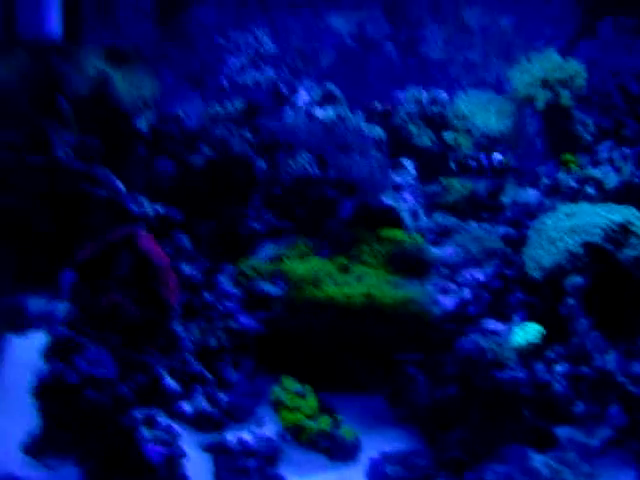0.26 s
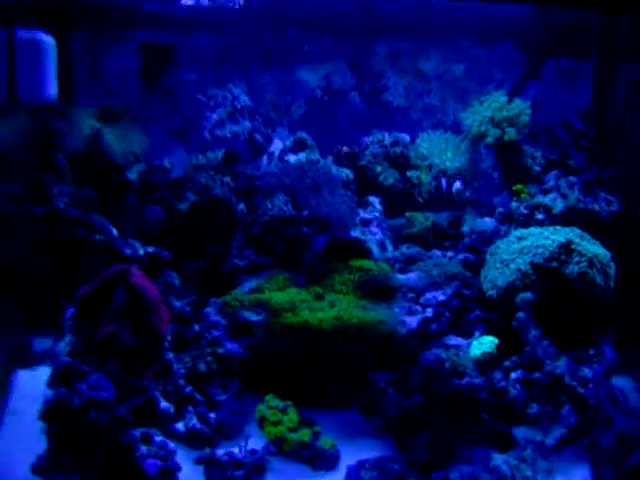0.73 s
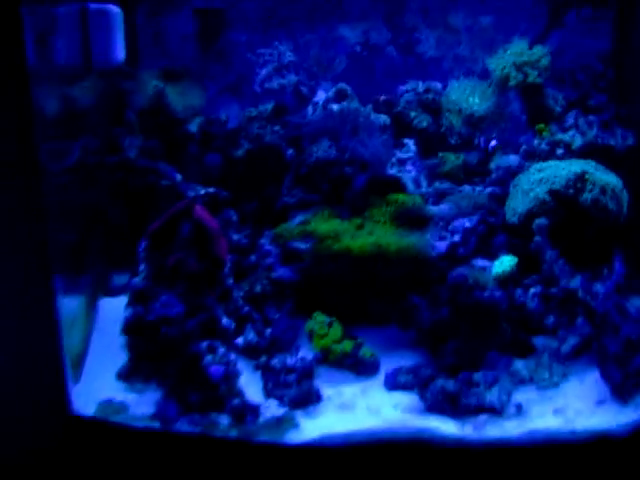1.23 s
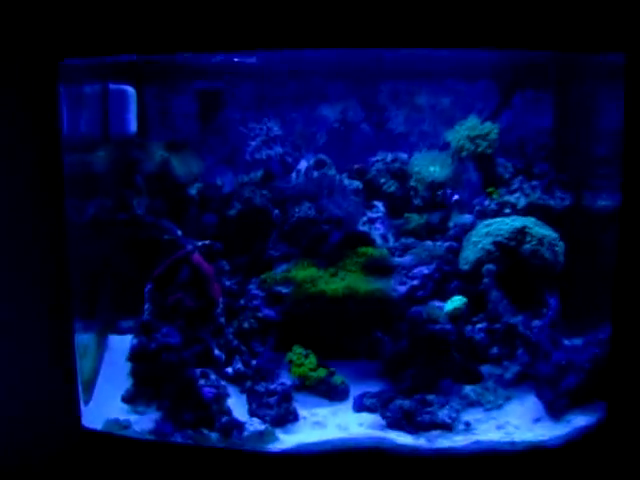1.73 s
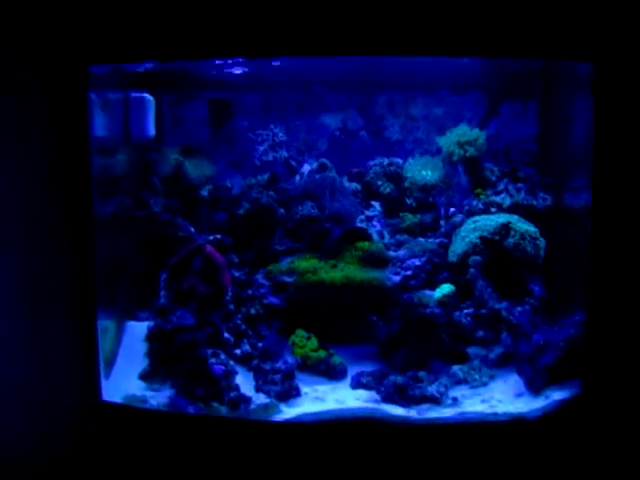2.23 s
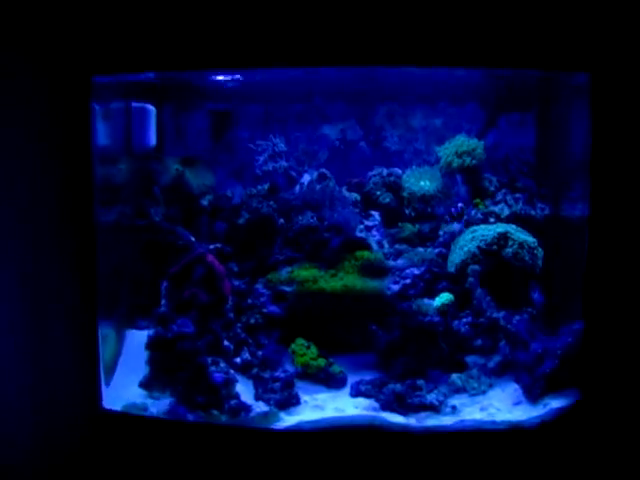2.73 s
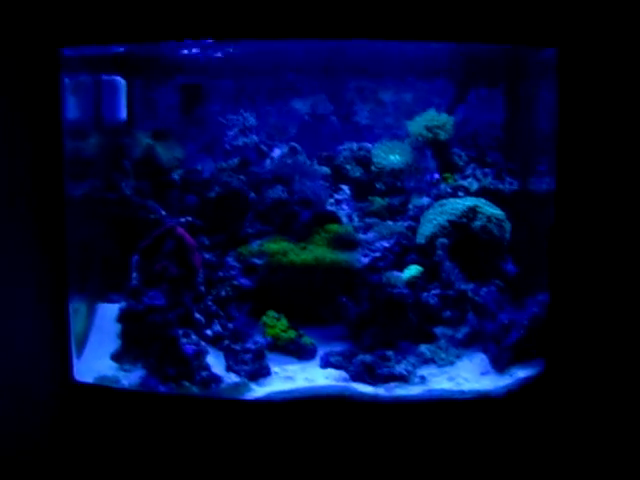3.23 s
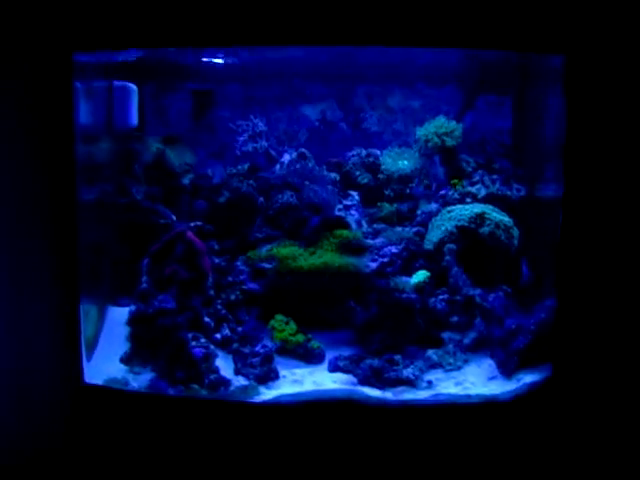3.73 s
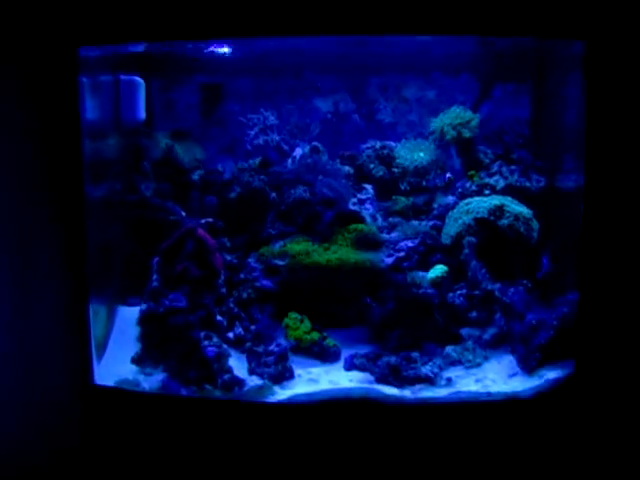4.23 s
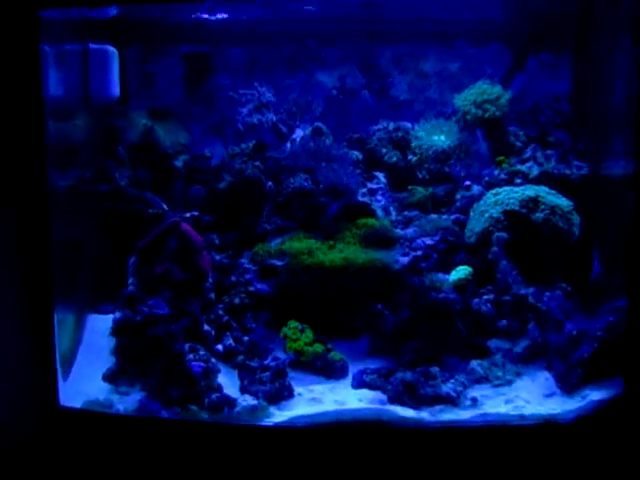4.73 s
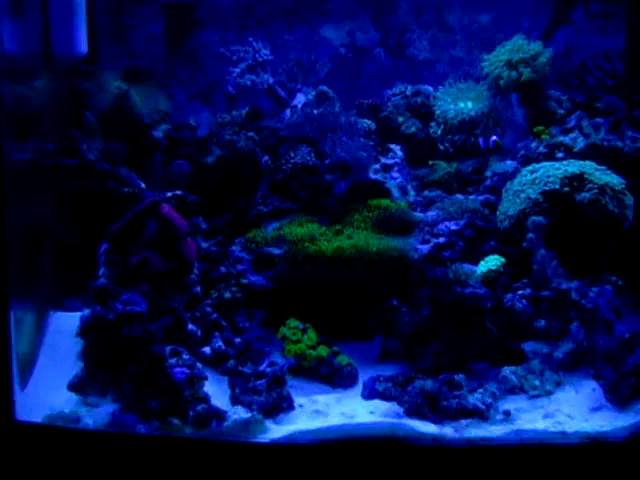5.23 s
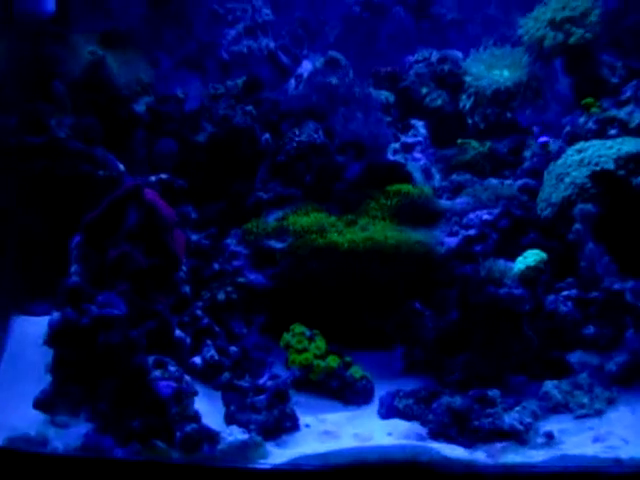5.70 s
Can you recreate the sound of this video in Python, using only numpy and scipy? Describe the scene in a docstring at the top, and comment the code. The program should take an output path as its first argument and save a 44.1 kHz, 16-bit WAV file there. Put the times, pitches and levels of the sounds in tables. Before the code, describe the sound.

A wooden floor creaks briefly, followed by soft knocks, over the steady hum, trickle and drips of a fish tank.

```python
"""Reef aquarium in a quiet room

The pump hums while returning water trickles, drips and splashes into a ringing overflow.
Someone steps back: a floorboard creaks as it sticks and slips, a few soft knocks follow,
and clothing rustles. The small microphone has a resonance high in the treble."""
import sys
import numpy as np
from scipy import signal
from scipy.fft import rfft, irfft, next_fast_len
from scipy.io import wavfile
from scipy.ndimage import map_coordinates

SR = 44100
rng = np.random.default_rng(int(sys.argv[2]) if len(sys.argv) > 2 else 0)


def wav_out(sig):
    """Save sig, one row per channel (or a flat mono array), as 16-bit PCM at SR to the path in sys.argv[1]."""
    wavfile.write(sys.argv[1], SR, np.round(np.clip(np.atleast_2d(sig).T, -1, 1) * 32767).astype(np.int16))


N = 262836

# The pump's tones. Each row: multiple of the mains frequency, relative level in dB.
PUMP_TONES = [(2, -29.5), (3, -21.5), (4, -10.5), (5, -27), (6, 0), (7, -27), (8, -23), (13, -17.5)]

def pump(mains_hz=60, level_db=-51, strong_waver_db=0.73, weak_waver_db=2):
    """The pump shakes the tank; its weak tones waver most, as they do when a microphone moves."""
    t = np.arange(N) / SR
    hum = np.zeros(N)
    for multiple, db in PUMP_TONES:
        phase = 2 * np.pi * (multiple * mains_hz * t + rng.random()) + 0.052 * wobble(2.7)
        waver_db = np.interp(db, [-10, 0], [weak_waver_db, strong_waver_db])
        hum += amp(db + waver_db * wobble(3.9)) * np.sin(phase)
    return amp(level_db) * unit(hum)


# How strongly the water runs. Each row: time in seconds, level in dB.
WATER_FLOW = [(0, -58), (1.2, -58.5), (1.7, -55.5), (2.1, -58.5), (2.6, -60.5), (4.2, -60), (5.1, -59.5),
              (5.4, -58.5), (5.96, -62.5)]
# The tone of the water's fizz. Each row: frequency in Hz, relative level in dB.
FIZZ_SPECTRUM = [(300, -10), (800, 12.5), (1300, 0), (2500, -7.5), (3300, -3), (4500, -5.5), (6000, -16.5),
                 (8000, -29.5), (12000, -16)]
# Notes of the air in the overflow. Each row: pitch in Hz, level in dB, seconds to fade by 60 dB.
OVERFLOW_NOTES = [(780.6, 2, 0.19), (1118, -5, 0.14), (1535, -2.5, 0.11), (1768, -6.5, 0.14),
                  (1960, -7.5, 0.21), (2353, -1, 0.085), (2470, -1, 0.098), (2890, -13, 0.19)]

def trickle():
    """Falling water: a fizz in bursts, tiny bubbles, and droplets that keep the overflow ringing."""
    t = seconds(.25)
    spurts = np.abs(excite(impacts(rate=90, spread_db=4.5), fade(t, 0.04)))
    fizz = coloured(rng.standard_normal(N) * (1 + 0.68 * unit(spurts)), FIZZ_SPECTRUM)
    hollow = sum(excite(impacts(rate=30, spread_db=2.5), ring([note], t)) for note in OVERFLOW_NOTES)
    return amp(curve(WATER_FLOW)) * (amp(-5) * fizz + amp(-4) * unit(hollow) + amp(-11) * bubbles())


def bubbles(per_second=220, centre_hz=3187, octaves=1.573, cycles=74, range_db=11):
    """A swarm of tiny bubbles, each a short rising ping."""
    out, t = np.zeros(N), seconds(.03)
    for when, pitch, strength in rng.random((int(per_second * N / SR), 3)):
        hz = centre_hz * 2 ** (octaves * (pitch - .5))
        ping = np.sin(2 * np.pi * hz * (t + t ** 2)) * fade(t, cycles / hz)
        add(out, when * N / SR, amp(range_db * strength ** 3) * ping)
    return unit(reflected(out, wet_db=1, t60=0.16))


# The clearest drips. Each row: start in seconds, relative level in dB, bubble pitch in Hz.
CLEAR_DRIPS = [(0.1384, -45, 2550), (0.1964, -45, 2420), (0.2887, -41.5, 2590), (1.0994, -47, 1950),
               (1.2815, -43, 1950), (1.4654, -46, 1757), (1.4884, -46.5, 2470), (1.6324, -39, 1770),
               (1.7024, -44.5, 2450), (1.8274, -43.5, 2545), (3.1204, -43, 2480), (3.5774, -43.5, 1530),
               (4.365, -46, 1950), (4.4914, -48.5, 2520), (4.8034, -47, 2770), (4.9836, -46, 2470),
               (5.0928, -48.5, 1950), (5.4534, -46.5, 2455), (5.4954, -43, 2440), (3.204, -45, 799),
               (5.562, -41, 783), (5.691, -46, 805)]

def drips(gain_db=-5, detune=0.023):
    """Each drip splashes and traps a bubble; the overflow holds the note on."""
    out, t = np.zeros(N), seconds(.2)
    drops = [(start, db + gain_db, hz) for start, db, hz in CLEAR_DRIPS]
    high_notes = [hz for hz, _, _ in OVERFLOW_NOTES if hz > 1650]
    for start, db, pick in faint_drops(per_second=5, over_flow_db=3, spread_db=9.5):
        index, fraction = divmod(pick * len(high_notes), 1)
        drops.append((start, db, high_notes[int(index)] * (1 + detune * (fraction - .5))))
    for start, db, hz in drops:
        plop_db = np.log2(1800 / hz)  # 1 dB louder for each octave lower
        decay = fade(t, 0.067) + 0.54 * fade(t, 0.16)
        bubble = amp(plop_db) * np.sin(2 * np.pi * hz * t) * decay
        splash = noise_band(t, hz, slope_db=23) * fade(t, 0.061)
        attack = 1 - np.exp(-t / 0.0016)
        add(out, start, amp(db) * attack * (bubble + 0.69 * splash))
    return out


# The clearest splashes. Each row: start in seconds, relative level in dB.
CLEAR_SPLASHES = [(0.394, -43), (1.269, -39.5), (1.5558, -46), (1.7054, -40), (1.879, -42), (2.0535, -39.5),
                  (2.2543, -43), (2.642, -41.5), (3.5453, -40), (4.2405, -47.5), (4.4679, -47),
                  (4.9682, -49), (5.731, -43.5)]

def splashes(gain_db=-9.5):
    """Drops hit the surface with a bright tick, a short spray and a fine sizzle."""
    out, t = np.zeros(N), seconds(.15)
    attack = 1 - np.exp(-t / 0.00063)
    faint = [(start, db) for start, db, _ in faint_drops(per_second=4, over_flow_db=10, spread_db=4.5)]
    for start, db in CLEAR_SPLASHES + faint:
        tick = noise_band(t, 4150, slope_db=38) * fade(t, 0.014)
        spray = noise_band(t, 2540, slope_db=15) * fade(t, 0.13)
        sizzle = noise_band(t, 10100, slope_db=42) * fade(t, 0.12)
        add(out, start, amp(db + gain_db) * attack * (0.82 * tick + 0.69 * spray + 0.13 * sizzle))
    return out


def faint_drops(per_second, over_flow_db, spread_db):
    """Uneven drops, louder in a stronger flow. Each row: start in seconds, dB, a random 0-1 pick."""
    delay, strength, pick = rng.random((120, 3)).T
    start = (np.arange(len(delay)) + delay) / per_second
    db = np.interp(start, *np.transpose(WATER_FLOW)) + over_flow_db + spread_db * (strength - .5)
    return np.transpose([start, db, pick])[start < N / SR]


def froth(gain_db=-17.5):
    """Tiny bubbles burst at the surface in a fine, high crackle."""
    pops = excite(impacts(rate=39, spread_db=4.5), fade(seconds(.03), 0.012))
    crackle = coloured(pops * rng.standard_normal(N), [(1500, -11), (4500, 7), (8000, -13), (11000, -3)])
    return amp(curve(WATER_FLOW) + gain_db) * crackle


# Runs of slips in the floorboard. Each row: start in seconds, length in seconds, slips per second
# at first, slips per second at the end, force in dB, cutoff in Hz (lower sounds duller).
SLIP_RUNS = [(0.417, .194, 70, 82, -2, 5900), (0.8264, .172, 61, 135, -1.5, 5100),
             (0.983, 0.089, 138, 143, -3.5, 850)]
# Single slips. Each row: start in seconds, force in dB, cutoff in Hz.
LONE_SLIPS = [(0.6563, 1.5, 4130), (.73, 0, 3930), (0.7807, 0.5, 5000), (1.002, 11.5, 282)]
# The notes the board rings at. Each row: pitch in Hz, level in dB, seconds to fade by 60 dB.
BOARD_NOTES = [(175, -23, 0.17), (234, -13, 0.132), (372.5, -2.5, 0.056), (427.5, 4, 0.11), (521, -7, 0.07),
               (682, -11.5, 0.18), (744, -13.5, 0.13), (791, -10.5, 0.15), (978, -13, 0.13),
               (1035, -12.5, .13), (1089, -15, 0.11), (1150, -32, 0.13), (1198.5, -13, 0.18),
               (1250, -20, 0.079), (1330, -23, 0.1), (1423, -16.5, 0.17), (1536, -20, 0.085),
               (1650, -34, 0.12), (1943, -17, 0.15), (2267, -15.5, 0.095), (2409, -12, 0.09),
               (2810, -28, 0.19), (3080, -32, .08)]
# How the floor and room answer a slip. Each row: frequency in Hz, relative level in dB.
FLOOR_SPECTRUM = [(50, -46), (110, -1), (190, -8), (400, -1), (1000, 0.5), (1600, -2.5), (2000, -6.5),
                  (2550, -5.5), (3250, -9.5), (3950, -19.5), (5200, -14), (7000, -26.5), (12000, -27)]

def creak():
    """The board sticks and slips; every slip rings the same notes, duller as the foot settles."""
    force, t, slip_t = np.zeros(N), seconds(.3), seconds(.06)
    for start, db, cutoff_hz in LONE_SLIPS + [slip for run in SLIP_RUNS for slip in slip_run(*run)]:
        grind = coloured(rng.standard_normal(len(slip_t)), [(400, -19), (1500, -11), (4000, 2)])
        slide = amp(-29) * grind * fade(slip_t, 0.1)
        slide[0] = 1  # a sharp break, then wood grinds on wood
        softening = np.exp(-2 * np.pi * cutoff_hz * slip_t)
        add(force, start, amp(db) * signal.fftconvolve(slide, softening / softening.sum()))
    floor_decay = fade(t, 0.21) + 0.93 * fade(t, 0.012)
    floor = coloured(rng.standard_normal(len(t)), FLOOR_SPECTRUM) * floor_decay
    snap = ring([(500, -1, 0.0054), (1540, -6.5, 0.0054)], t)  # the board's first flex
    board = amp(-33.5) * ring(BOARD_NOTES, t) + amp(-42) * floor + amp(-25.5) * snap
    bass_cut = signal.butter(2, 130, "highpass", fs=SR, output="sos")  # the creak carries little bass
    return excite(force, signal.sosfilt(bass_cut, board))


def slip_run(start, length, first_rate, last_rate, db, cutoff_hz, jitter_s=0.0002, scatter_db=1.5):
    """The slips of one creak speed up smoothly; quicker ones build less strain, so they are weaker."""
    t = seconds(length)
    rate = first_rate * (last_rate / first_rate) ** (t / length)
    count = np.cumsum(rate) / SR
    when = np.interp(np.arange(count[-1]), count, t)
    force_db = db - 5 * np.log2(np.interp(when, t, rate) / first_rate)
    force_db += np.interp(when, [length - 0.021, length], [0, -9])  # the last slips fade
    force_db[0] += 2  # breaking free takes extra force
    late, extra = rng.standard_normal((len(when), 2)).T
    when += jitter_s * late
    force_db += scatter_db * extra
    return [(start + offset, level, cutoff_hz) for offset, level in zip(when, force_db)]


# Soft knocks. Each row: start in seconds, relative level in dB, centre in Hz, width in octaves.
SOFT_KNOCKS = [(.217, -50, 1040, 1.5), (1.002, -28, 383, 1.13), (1.381, -55, 310, 2.7),
               (1.61, -43.5, 500, 1.6), (1.743, -39.5, 520, 1.75), (1.869, -40, 387, 1.9),
               (1.902, -35, 400, 2.4), (2.041, -39, 288, 1.46), (4.145, -51, 140, 1.4),
               (5.369, -49, 760, 1.6), (5.538, -54, 100, 1.4), (5.783, -47, 600, 0.7)]

def knocks(gain_db=-4, rebound_s=0.015, rebound_db=-10):
    """Dull contacts: a push, a weaker second touch and a short rattle, dying away in the room."""
    out, t = np.zeros(N), seconds(.25)
    for start, db, hz, octaves in SOFT_KNOCKS:
        blow = rng.standard_normal(len(t)) * (fade(t, 0.083) + 0.44 * fade(t, 0.21))
        blow[[0, round(rebound_s * SR)]] += 16 * amp([0, rebound_db])
        edges_hz = hz * 2 ** (octaves * np.array([-.5, .5]))
        thud = signal.sosfilt(signal.butter(2, edges_hz, "bandpass", fs=SR, output="sos"), blow)
        opening_level = thud[:SR // 64].std()
        add(out, start, amp(db + gain_db) * thud / opening_level)
    return out


# Brushes of clothing. Each row: time it lets go in seconds, level in dB,
# seconds to rise by 20 dB, seconds to fall by 20 dB.
CLOTH_STROKES = [(.803, -48.5, 0.028, 0.19), (0.851, -39, 0.0042, 0.0088), (1.164, -49, 0.014, 0.045),
                 (2.998, -52, .1, 0.065), (3.083, -38.5, 0.034, .003), (3.372, -46.5, 0.022, 0.059)]
# The tones of sliding and of snagging cloth. Each row: frequency in Hz, relative level in dB.
SLIDE_SPECTRUM = [(80, -30), (300, 3), (1200, -2.5), (2000, 0.5), (2900, 5.5), (3800, 0), (4800, 3),
                  (6500, -13), (9000, -20), (12000, -10)]
SNAG_SPECTRUM = [(500, -23), (2600, -17), (3400, 0.5), (3800, 1.5), (4400, 3.5), (5100, -4.5),
                 (6300, -22.5), (9000, -22.5), (12000, -19.5)]

def rustle(snag_db=-46.5, snag_range_db=2.5):
    """Cloth rubs with a grainy sound that swells, holds and lets go; a harder pull snags more."""
    t, pull = np.arange(N) / SR, np.zeros(N)
    slide = coloured(rng.standard_normal(N) * amp(3 * wobble(600)), SLIDE_SPECTRUM)
    snag = coloured(rng.standard_normal(N) * amp(3 * wobble(600)), SNAG_SPECTRUM)
    for release, db, rise, fall in CLOTH_STROKES:
        before = (release - t) / rise - 0.32  # full pull is held for 0.32 of the rise time
        after = (t - release) / fall
        pull += amp(db) * 10 ** -np.clip(np.maximum(before, after), 0, 10)
    snag_share = 1 / (1.5 + np.exp((snag_db - 20 * np.log10(pull)) / snag_range_db))
    return pull * (np.sqrt(1 - snag_share) * slide + np.sqrt(snag_share) * snag)


# Small ticks. Each row: start in seconds, relative level in dB, strongest frequency in Hz.
HARD_TICKS = [(1.082, -45, 7000), (3.281, -39.5, 2800), (3.849, -41, 2980), (4.1504, -35, 4700),
              (5.229, -47, 4500)]

def ticks(gain_db=-8):
    """Tiny hard ticks with hardly any ring."""
    out, t = np.zeros(N), seconds(.03)
    for start, db, hz in HARD_TICKS:
        add(out, start, amp(db + gain_db) * noise_band(t, hz, slope_db=21) * fade(t, 0.0086))
    return reflected(out, wet_db=-14, t60=0.24)


# Feet moving on the floor. Each row: time in seconds, level in dB.
SHUFFLE_LEVELS = [(0, -56.5), (2.1, -56), (2.38, -52.5), (2.5, -63), (5.2, -72), (5.4, -58.5), (5.96, -68)]
# The tone of the background rush. Each row: frequency in Hz, relative level in dB.
RUSH_SPECTRUM = [(25, -15), (90, -10), (135, -5), (200, -1), (400, 3), (600, -6), (1000, -11.5),
                 (2500, -17), (8000, -33)]

def room():
    """The low rush of the room and of water in the pipes, and the lumpy shuffle of feet."""
    feet_spectrum = [(40, -43), (120, -4.5), (190, 2), (500, -0.5), (1100, -10),
                     (2500, -22), (8000, -40.5)]
    feet = coloured(rng.standard_normal(N), feet_spectrum)
    rush = amp(-57.5 + 1.7 * wobble(6)) * coloured(rng.standard_normal(N), RUSH_SPECTRUM)
    return rush + amp(curve(SHUFFLE_LEVELS) + 3.2 * wobble(35)) * feet


def reflected(x, wet_db, t60):
    """Add the quick echoes of the tank and the walls."""
    t = seconds(.25)
    tail = rng.standard_normal(len(t)) * fade(t, t60) * (t > .002)
    return x + amp(wet_db) * excite(x, tail / np.linalg.norm(tail))


def amp(db):
    """Turn decibels into a gain."""
    return 10 ** (np.asarray(db) / 20)


def unit(x):
    """Scale x to an average (rms) level of 1."""
    return x / np.sqrt(np.mean(x ** 2) + 1e-20)


def seconds(length):
    """The time of each sample, in seconds."""
    return np.arange(int(length * SR)) / SR


def curve(points):
    """Join (time, value) points with straight lines across the scene."""
    return np.interp(np.arange(N) / SR, *np.transpose(points))


def wobble(rate):
    """A smooth curve through rate random points a second."""
    return map_coordinates(rng.standard_normal(int(N * rate / SR) + 4), [np.arange(N) * rate / SR])


def filtered(x, response):
    """Scale each frequency in x by the gain response(hz)."""
    size = next_fast_len(len(x) + 8192)
    return irfft(rfft(x, size) * response(np.fft.rfftfreq(size, 1 / SR)), size)[:len(x)]


def coloured(x, spectrum):
    """Shape the tone of x with (Hz, dB) points, then scale it to level 1."""
    points_hz, db = np.transpose(spectrum)
    return unit(filtered(x, lambda hz: amp(np.interp(np.log(hz + 1), np.log(points_hz), db))))


def noise_band(t, peak_hz, slope_db):
    """Noise that falls by slope_db an octave on both sides of its peak."""
    noise = rng.standard_normal(len(t))
    return unit(filtered(noise, lambda hz: amp(-slope_db * np.abs(np.log2((hz + 1) / peak_hz)))))


def fade(t, t60):
    """Die away by 60 dB every t60 seconds."""
    return np.exp(-np.log(1000) * t / t60)


def ring(notes, t):
    """The fading notes of something struck; neighbours swing in opposite directions."""
    return sum((-1) ** k * amp(db) * fade(t, t60) * np.sin(2 * np.pi * hz * t)
               for k, (hz, db, t60) in enumerate(notes))


def impacts(rate, spread_db):
    """Randomly timed taps of uneven size, about rate a second."""
    return (rng.random(N) < rate / SR) * amp(spread_db * np.clip(rng.standard_normal(N), -2, 2))


def excite(pushes, response):
    """Every push sets off its own copy of the response."""
    return signal.fftconvolve(pushes, response)[:N]


def add(track, start, sound):
    """Mix a sound into the track at start seconds."""
    part = track[max(round(start * SR), 0):][:len(sound)]
    part += sound[:len(part)]


def scene():
    """The tank, the person and the room all reach one microphone."""
    tank = pump() + trickle() + drips() + splashes() + froth()
    return (tank + ticks() + creak() + knocks() + rustle() + room())[None]


def record(dry, peak_hz=10900, width_hz=780, peak_db=10, top_hz=12400):
    """The microphone's resonance lifts a narrow band of treble; the very top is cut off."""
    def response(hz):
        resonance = amp(peak_db * np.exp(-((hz - peak_hz) / width_hz) ** 2))
        treble_cut = amp(np.interp(hz, [11200, top_hz], [0, -13])) * (hz < top_hz)
        return resonance * treble_cut
    return filtered(dry[0], response)[None]


dry = scene()
out = record(dry)
wav_out(out)
```